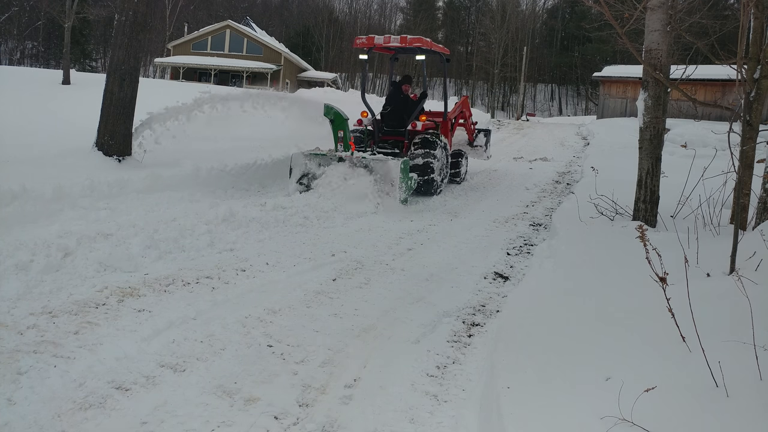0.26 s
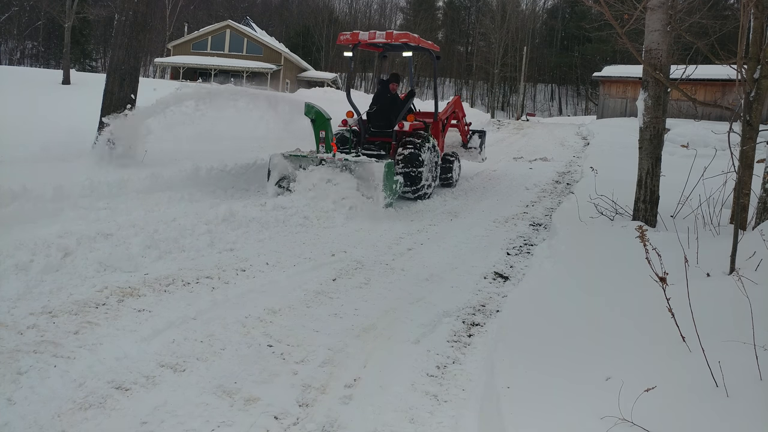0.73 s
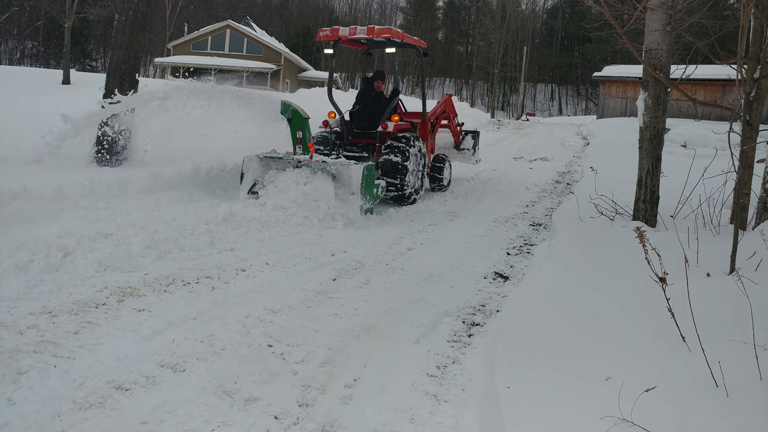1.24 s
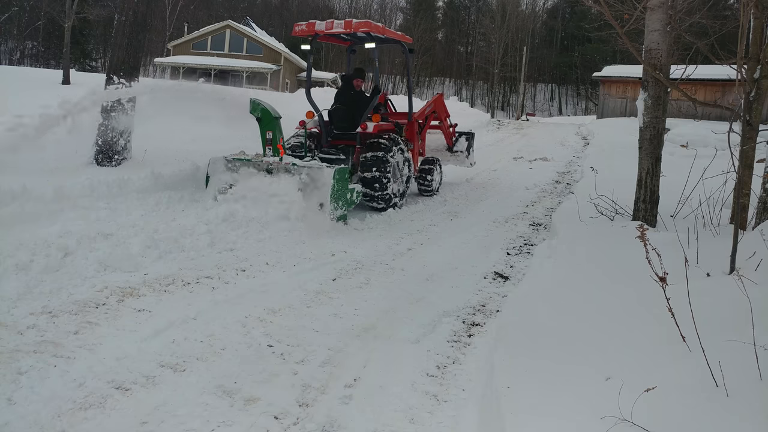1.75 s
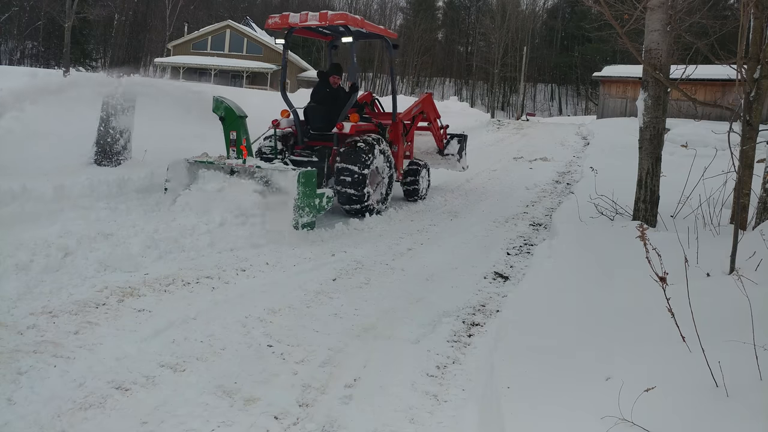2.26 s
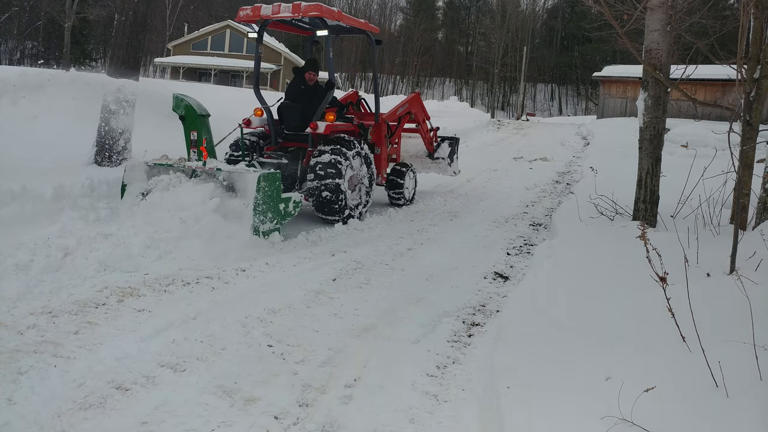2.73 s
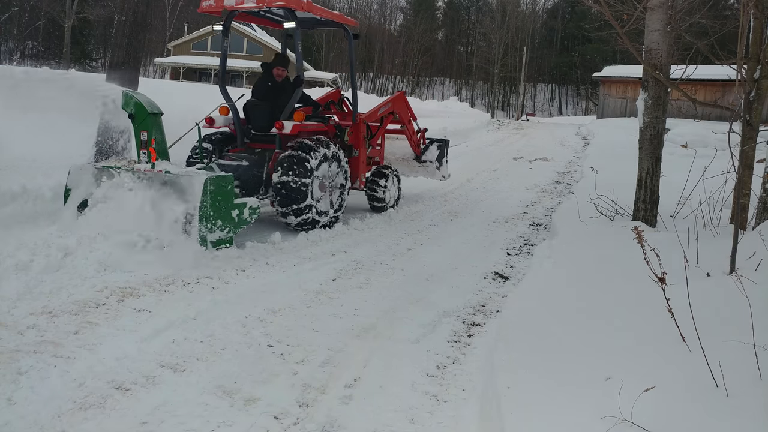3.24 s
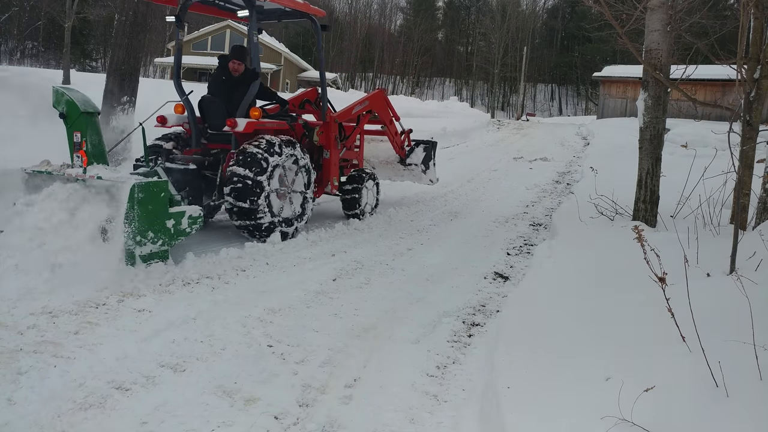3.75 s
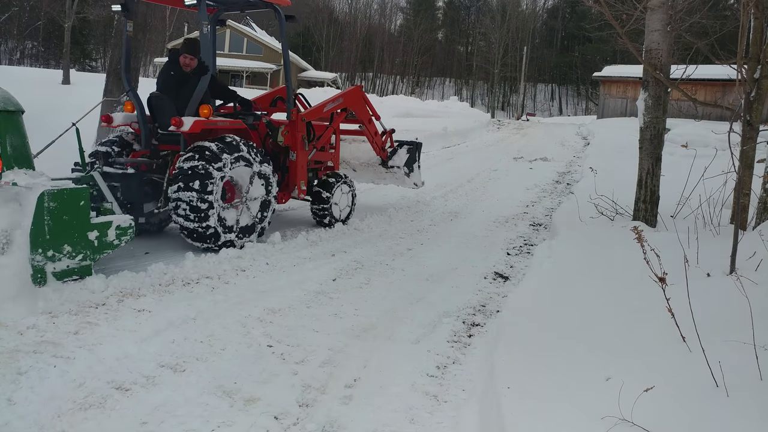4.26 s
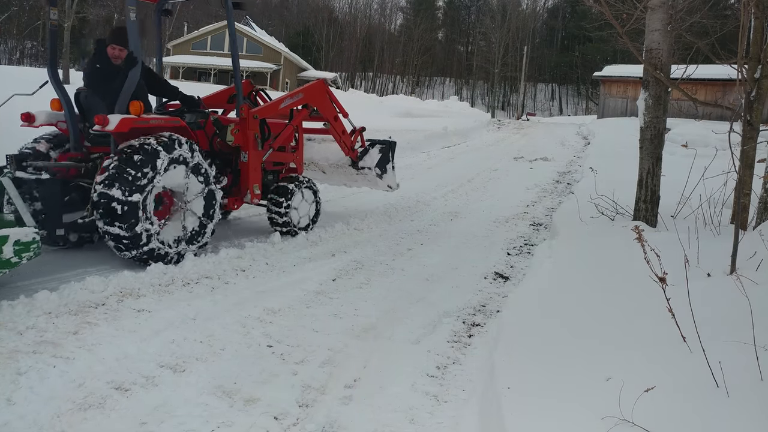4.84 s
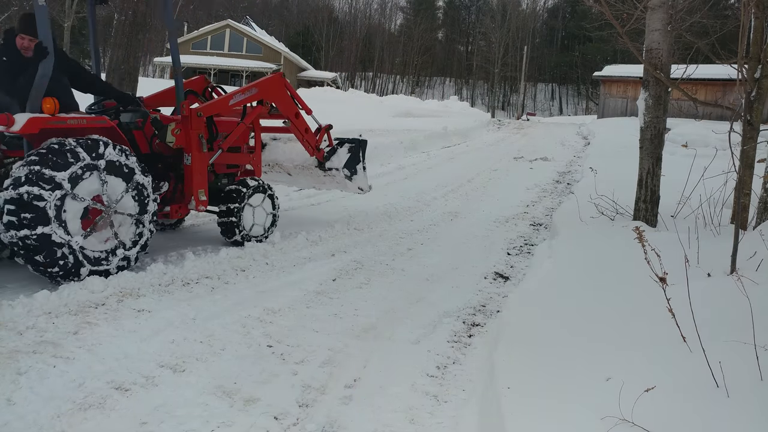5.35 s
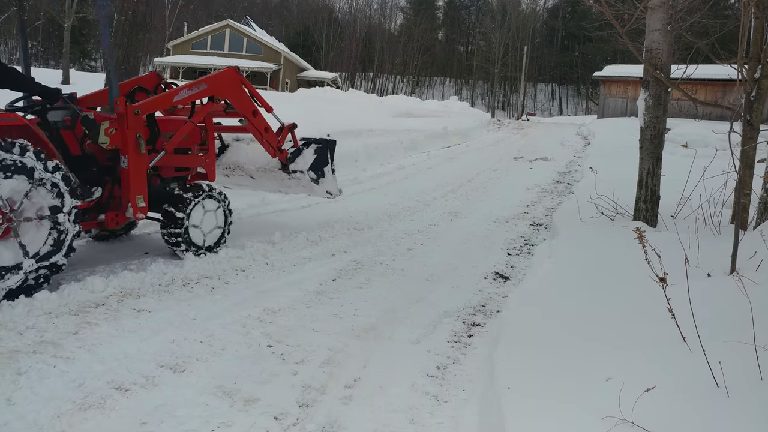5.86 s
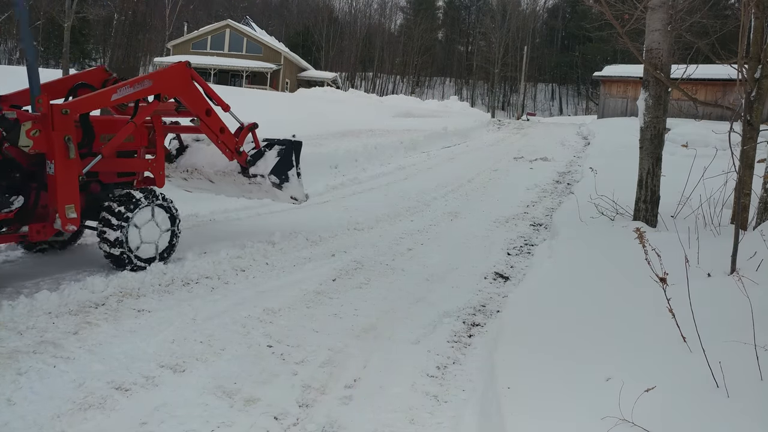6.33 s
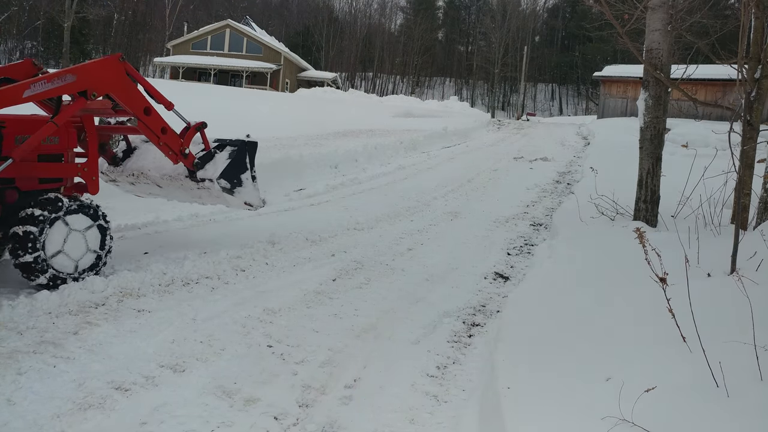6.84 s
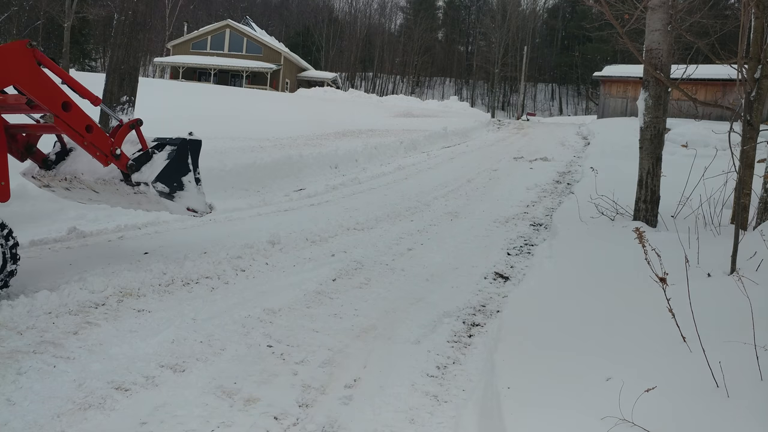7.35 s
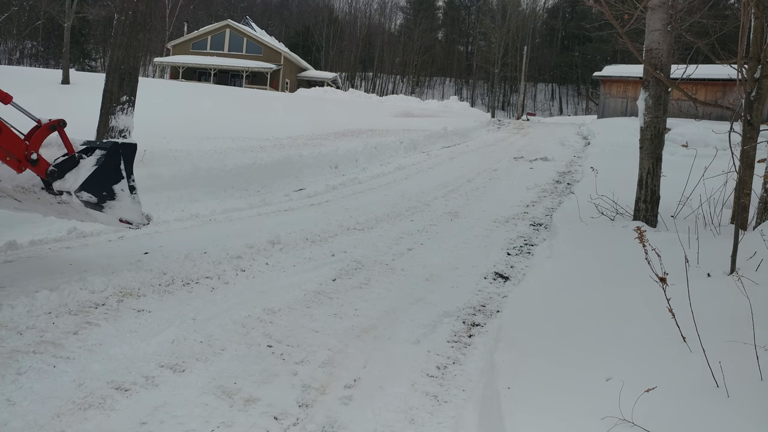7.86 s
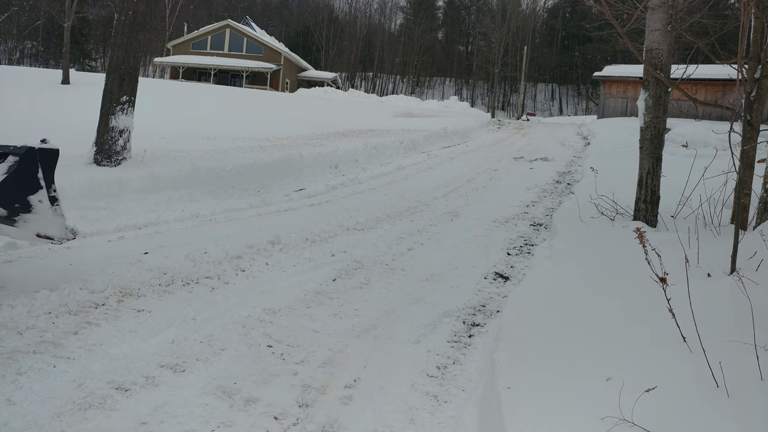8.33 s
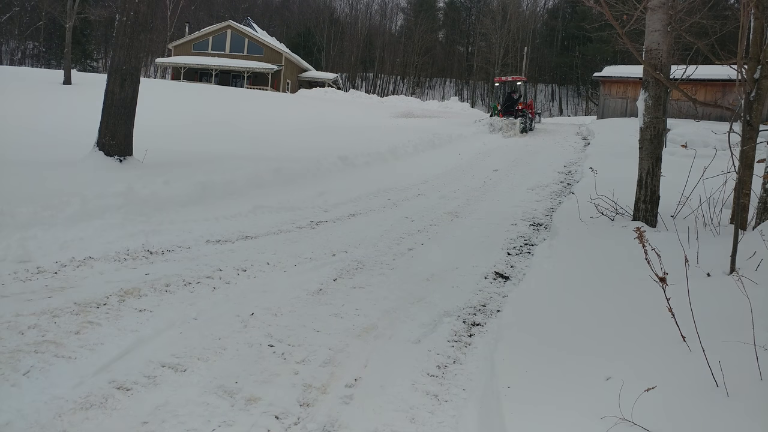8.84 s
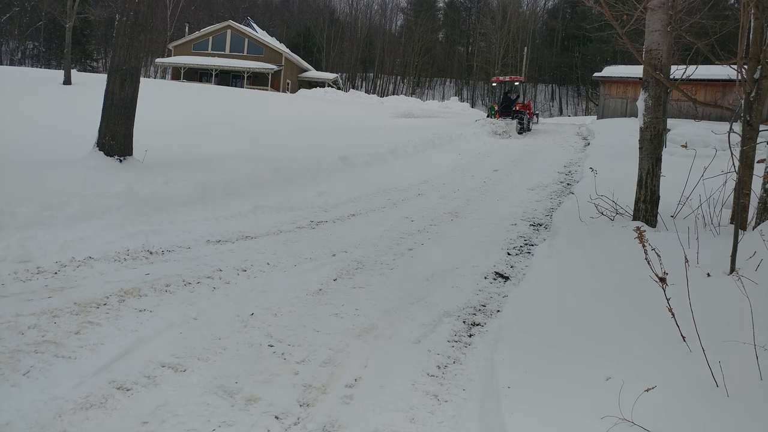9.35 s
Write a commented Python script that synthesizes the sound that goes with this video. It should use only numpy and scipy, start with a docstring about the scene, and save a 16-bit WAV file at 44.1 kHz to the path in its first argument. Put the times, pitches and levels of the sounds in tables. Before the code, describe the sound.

A small diesel tractor backs a snowblower closer, throbbing and growling as snow hisses and ice cracks, then suddenly sounds far off.

```python
"""A three-cylinder diesel tractor backs a snowblower towards a microphone pair, ever closer and further left.
Wind gusts buffet the pair first (low noise) over exhaust (phased partials), gear tones and clattering roar
(throbbing noise); fan blades beat with the exhaust. Snow hisses up the chute; ice cracks (short noise bursts),
then grit pings and the block knocks (damped tones). After a cut the tractor is heard from far off."""
import sys
import numpy as np
from scipy import signal
from scipy.fft import rfft, irfft, next_fast_len
from scipy.io import wavfile
from scipy.ndimage import uniform_filter1d, map_coordinates

SR = 44100
rng = np.random.default_rng(int(sys.argv[2]) if len(sys.argv) > 2 else 0)


def output_pcm(signal):
    """Save a mono or channel-first signal as 16-bit PCM at the path in sys.argv[1].

    Samples are clipped to [-1, 1] before scaling.
    """
    pcm = np.clip(np.atleast_2d(signal).T, -1, 1) * 32767
    wavfile.write(sys.argv[1], SR, np.round(pcm).astype(np.int16))


N = 422911
T = np.arange(N) / SR  # s
CUT_S = 8.415  # the near scene ends here

# Motion along a straight line: position and velocity as (left, ahead)
START_M, VELOCITY_M_PER_S = (0.42, 14.94), (0.29, -1.551)
BLOWER_LEAD_S = 0.41  # the blower reaches each point of the line this much earlier
PAIR_M, FAR_LEFT = 0.1994, -0.2  # microphone spacing; sine of the leftward bearing far off
# Share of noise common to both microphones: [pitch_hz, share]
COMMON_SHARE = [(50, 0.62), (100, 0.98), (500, 0.92), (1500, 0.72), (4000, 0.39), (9000, 0.16)]
# Left minus right level across the spectrum: [pitch_hz, difference_db]
SHADOW = [(1000, 0), (3000, -1.5), (5000, 1), (8500, 6), (13000, 1)]

# Engine speed; the load drags it down at first: [time_s, firing_rate_hz]
FIRING_RATE = [(0, 47.97), (.6, 48.88), (1.4, 48.83), (1.75, 51.84), (2.0, 53.43), (4, 52.95), (6.5, 53.35),
               (8.41, 53.02), (8.42, 43.1), (8.67, 44.45), (8.87, 44.28), (9.12, 42.5), (9.59, 41.94)]
LOADED_HZ, REV_DB_PER_HZ = 47.92, 0.6034  # louder as the revs recover
EXHAUST_DB, ROAR_DB = (-25, -37), (-31, -47.5)  # (reference at the start, far off)
ROAR_SPREAD = 0.92  # share of the inverse-distance gain that the long machine shows
# Exhaust partials; every third is a firing order: [multiple_of_four_stroke_cycle, near_db, far_db]
PARTIALS = [(3, 1.5, 0), (4, -43, -11), (5, -21.5, -36), (6, -1, 3.5), (8, -29.5, -29), (9, -6.5, -9.5),
            (10, -16, -34), (12, -6.5, -5), (13, -14, -39), (15, -2.5, -15), (18, -12, -16.5),
            (26, -23, -34), (30, -18, -47), (32, -18.5, -42)]
# Resonance and tone levels: [time_s, pipe_ring_db, gear_whine_db, third_firing_order_db]
RING = [(0, -4, -50.5, 2.5), (1.2, -9.5, -44, -1.5), (1.5, -5.5, -36, 1), (1.8, -4, -44, -1.5),
        (2.2, -3.5, -36, 1), (3, -4, -34, 3), (3.9, -2.5, -40.5, 4.5), (4.3, -1.5, -31.5, 3),
        (5.5, -2.5, -34, 0.5), (6.8, -1, -34, -13.5), (7.5, 0, -26.5, -1.5), (8.4, -4, -30, 1),
        (8.42, 2.5, -53, -1), (8.67, 3, -49.5, 4), (9.12, 1.5, -59, -5.5), (9.59, 3, -62.5, -0.5)]
# Upper exhaust partials come and go:
# [time_s, multiple_18_db, multiple_26_db, multiple_30_db, multiple_32_db]
UPPER = [(4.5, 2.5, 2, -3.5, 0), (5.35, -10, 1, 2, 0), (6.8, 3, -4, -0.5, 4), (7.4, -1, -3, 5, -1),
         (8.2, -9, 7.5, 4, -2)]
UPPER_ORDERS = (18, 26, 30, 32)
# Gear partials: [multiple_of_firing_rate, level_db]
WHINE = [(16, -0.5), (32, -6.5), (34, -7.5)]
# Pump tone before its final fade: [time_s, second_partial_hz, level_db]
PUMP = [(0, 1108, -54), (.5, 1092, -44.5), (1.2, 1120, -44.5), (1.7, 1126, -53)]

# Relative roar spectra at the start, close by and far off: [pitch_hz, density_db_per_hz]
ROAR_START = [(18, -32.5), (30, -8), (78, 0), (226, -8.5), (393, -20), (479, -27), (547, -21), (683, -26),
              (763, -25.5), (1390, -29), (1620, -26.5), (1980, -31.5), (2470, -32.5), (3680, -44.5),
              (6000, -47.5)]
ROAR_NEAR = [(18, -26), (30, -16), (70, -14.5), (109, -8), (162, -10.5), (263, -12), (315, -28.5),
             (367, -19), (560, -20.5), (683, -20.5), (853, -23), (1110, -25.5), (1850, -23.5),
             (2260, -30.5), (3600, -32), (6000, -46)]
ROAR_FAR = [(18, -54.5), (30, -18), (67, -4), (91, -3), (130, -17), (181, -17), (216, -30), (263, -19),
            (401, -31), (524, -24.5), (834, -31), (1390, -26.5), (1850, -30.5), (2360, -43), (6000, -54)]
# Share of the roar that repeats each cycle: [pitch_hz, share]
REPEATS = [(330, 0.0058), (480, 0.21), (560, 0.21), (900, 0.2), (2000, 0.26), (4000, 0.091)]

BLADES_PER_FIRING, AUGER_PER_FIRING = .5508, .0433  # gearing of the blower fan and auger
# Blade partials, each with a partner one auger turn lower: [multiple_of_blade_rate, level_db, partner_db]
BLADES = [(2, -3, -6.5), (3, -6.5, -6)]
# Level of the blade hum: [time_s, level_db]
FAN = [(0, -28), (2, -25.5), (4, -22), (6, -23.5), (7.4, -28.5), (8.41, -32), (8.42, -60.5)]

# Relative spectrum of the rushing snow: [pitch_hz, density_db_per_hz]
SPRAY = [(880, -28.5), (1500, -11.5), (1760, 1), (2700, -9), (3990, -9.5), (4770, -4.5), (5710, -7),
         (7040, -15), (8340, -6.5), (9220, -9.5), (10700, -43), (11800, -22.5), (13500, -22),
         (15200, -28.5), (16300, -42.5)]
# Mean level of the thrown snow: [time_s, level_db]
SNOW = [(0, -42.5), (.52, -47.5), (1.95, -39.5), (2.27, -32.5), (2.9, -35.5), (3.63, -31), (4.38, -32),
        (5.83, -30.5), (6.86, -27), (8.41, -24.5), (8.417, -57), (8.83, -68.5), (9.59, -64)]
# Bright bands sinking through the rush as the machine nears, perhaps from ground reflection:
# [start_s, end_s, from_hz, to_hz, top_db]
SWEEPS = [(2.8, 5.6, 5600, 2510, 7.5), (6.3, 8.0, 4200, 2000, 2.5)]
SWEEP_OCTAVES = .3

# Relative spectrum of wind turbulence: [pitch_hz, density_db_per_hz]
BUFFET = [(24, -33), (40, -3), (70, -7.5), (124, -2), (236, -20.5), (274, -14.5), (459, -33), (500, -17.5),
          (650, -70)]
BREEZE_DB, BREEZE_FAR_DB = -29.5, -39
# Gusts: [centre_s, half_length_s, level_db, left_minus_right_db]
GUSTS = [(0.337, 0.013, -7.5, 13), (0.443, 0.069, -11, 9.5), (0.536, 0.053, -12, 10),
         (0.948, 0.12, -20, 14), (1.148, 0.01, -15, 15), (1.447, 0.026, -9, -19), (1.58, 0.081, -13.5, -6)]

# Ice blows: [start_s, chute_db, housing_db, brightest_hz, near_length_s]
CRACKS = [(0.2252, -33, -14, 2720, 0.006), (0.66, -38.5, -34, 4500, 0.0051),
          (1.0326, -23, -21.5, 5300, 0.0095), (1.074, -21, -18, 5030, 0.0061),
          (1.0784, -23.5, -26, 8550, 0.0065), (1.11, -27.5, -33, 3400, 0.0052),
          (1.299, -30, -26, 5000, 0.0092), (2.059, -31, -42, 8400, 0.014), (2.105, -27, -17, 2600, .006),
          (2.129, -25, -23, 5030, 0.0054), (2.149, -27.5, -11.5, 2930, 0.015),
          (2.181, -26.5, -21, 2550, 0.0092), (2.219, -15, -18, 8610, 0.0057),
          (2.2405, -15, -17, 5500, 0.0061), (2.2775, -9, -40, 8000, 0.001),
          (2.2954, -15, -22, 8000, 0.0058), (2.3287, -13, -17.5, 5600, 0.0085),
          (2.355, -30, -19, 2840, 0.0072), (2.623, -23, -45, 8850, 0.0039),
          (2.999, -23.5, -26, 4600, 0.0063), (3.133, -21, -37, 4500, 0.0025),
          (3.252, -19.5, -43, 5360, 0.0043), (3.437, -27, -24, 5150, 0.0095),
          (3.61, -28, -25, 4980, 0.0099), (3.649, -23.5, -22.5, 5615, 0.0054),
          (3.823, -27, -35, 4500, 0.0056), (3.905, -22, -31, 8200, 0.0063), (3.986, -28, -33, 4400, 0.0063),
          (4.067, -31, -35, 2608, .006), (4.399, -29, -36, 8620, 0.0046), (4.462, -32, -36, 2800, 0.0045),
          (4.629, -14.5, -30, 5960, 0.0052), (4.6573, -14, -32, 5860, 0.0055),
          (4.7895, -20.5, -32, 6000, 0.0041), (5.0178, -14.5, -11, 5600, 0.0042),
          (5.032, -15, -17, 3817, 0.0039), (5.19, -20.5, -16, 5700, 0.0075),
          (5.214, -21.5, -16, 3100, 0.0054), (5.26, -18.5, -25.5, 8350, 0.0075),
          (5.346, -27.5, -32, 8600, 0.015), (5.379, -15.5, -39, 8400, 0.0052),
          (5.393, -15, -34, 5700, 0.0076), (5.405, -21, -24, 4020, 0.0056),
          (5.901, -21.5, -24, 4760, 0.0029), (6.838, -22.5, -14, 3650, 0.005),
          (6.924, -12, -26, 4000, 0.0044), (6.9925, -11.5, -28, 4000, 0.0048),
          (7.0327, -8.5, -15, 4260, 0.0063), (7.501, -7.5, -14, 5877, 0.0059),
          (7.59, -14.5, -22.5, 3815, 0.004), (7.5992, -16.5, -15, 5790, 0.0055),
          (7.714, -12, -28, 5700, 0.0078), (7.7255, -8, -11, 5700, 0.0047), (7.858, -10, -32, 5740, 0.0041),
          (8.177, -20, -19, 5850, 0.0078), (8.386, -24, -19, 3720, 0.0074),
          (8.793, -62, -43.5, 2660, 0.0061), (9.077, -64, -42.5, 2615, .0058),
          (9.384, -64, -44, 2833, 0.0049), (9.545, -51.5, -33.5, 2710, 0.0074)]
# Relative spectrum of a burst in the chute: [pitch_hz, density_db_per_hz]
CRACK = [(290, -42.5), (500, -25.5), (936, 1.5), (1580, -7), (2120, 0), (2480, -4.5), (4020, -5.5),
         (5700, -7.5), (6890, -9), (8330, -4), (9220, -7.5), (10500, -27.5), (12000, -18), (15100, -19.5),
         (16300, -44.5)]
# Modes of the blower housing: [pitch_hz, level_db, width_hz]
HOUSING = [(470, -1, 60.3), (930, 1.5, 190), (1150, -4, 100), (1400, -4.5, 130), (1787, -4, 140),
           (2090, -3.5, 230)]
# Modes of the chute: [turned_away_hz, facing_hz, level_over_burst_db, width_hz]
CHUTE = [(2590, 2590, -0.5, 150), (3150, 3980, 8.5, 480), (5600, 5860, 4, 250), (8400, 8400, 5, 500)]
# The chute's modes shift and stand out as it comes to face the microphones
CHUTE_FACES_S, CHUTE_TURN_S, CHUTE_EARLY = 5.5, 0.55, 0.41  # midpoint, logistic scale, share at first
RISE_SHARE, TAIL_PER_S = .15, 62.5  # rise as a share of length; tail height per second of length
# Clear notes left in the steel by the hardest blows: [start_s, pitch_hz, peak_db, decay_s]
NOTES = [(0.226, 980, -13, .006), (0.225, 1390, -18, .004), (1.075, 1050, -13.5, 0.005),
         (1.075, 1970, -12, .004), (2.151, 1210, -11, 0.0093), (2.156, 910, -11, .008),
         (2.214, 888, -15.5, .006), (2.241, 1930, -13.5, 0.0052), (5.019, 1020, -11, .006),
         (5.034, 861, -12.5, 0.018), (5.193, 776, -14, 0.01506), (5.2, 373, -15.5, 0.017),
         (5.203, 465, -16.5, 0.031), (6.927, 4100, -5, .003), (6.993, 4020, -10.5, 0.0033),
         (7.035, 4120, -11.5, .005), (7.717, 5940, -10, .004), (7.719, 4100, -9, 0.0059),
         (7.727, 2130, -3.5, 0.0054), (8.388, 1950, -9.5, .006), (7.859, 5736, -11, 0.0043)]

# Fine grit pinging in the chute, its pitch sinking from high to low over about three seconds
GRIT_CENTRE_S, GRIT_HALF_SPAN_S, GRIT_PEAK_PER_S = 3.5, 1.45, 170
GRIT_DB, GRIT_HZ, GRIT_DECAY_S = -36.5, (6530, 2420), 0.0017
# Gear tones that swell and fade briefly: [multiple_of_four_stroke_cycle, centre_s, half_length_s, level_db]
SPELLS = [(96, 4.15, .35, -41.5), (102, 4.0, .45, -40.5), (105, 5.36, .2, -37.5), (204, 6.9, 0.43, -43.5)]
# Knocks of the block: [start_s, peak_db]
KNOCKS = [(3.877, -24), (3.898, -26), (4.045, -23), (4.102, -25), (4.196, -19), (4.386, -23), (4.858, -22),
          (4.951, -16), (5.007, -19), (5.12, -16.5), (5.178, -22)]
KNOCK_HZ, KNOCK_RING_S = (1716, 1630), 0.0037  # pitch at the first and last knock

LOW_CUT_HZ, EDGE_HZ = 43.2, 16430  # limits of the recorded band


def amp(db):
    """Logarithmic level: decibels become an amplitude ratio."""
    return 10 ** (np.asarray(db) / 20)


def unit(x):
    """Power normalisation: the signal is scaled to rms 1."""
    return x / np.sqrt(np.mean(x ** 2) + 1e-20)


def read(points, hz):
    """Spectral interpolation: values run straight between points on a log-frequency axis."""
    f, value = np.transpose(points)
    return np.interp(np.log(hz + 1), np.log(f + 1), value)


def curve(rows, t, axis):
    """Linear interpolation: one column of a table over time."""
    rows = np.array(rows, float)
    return np.interp(t, rows[:, 0], rows[:, axis])


def drift(rate_hz):
    """Slow fluctuation: sixteen sines of random phase, up to rate_hz, sum to rms 1."""
    phases = rng.random(16)
    rates = np.geomspace(rate_hz / 10, rate_hz, len(phases))
    t = T[::64]
    slow = sum(np.sin(2 * np.pi * (f * t + p)) for f, p in zip(rates, phases))
    return np.interp(T, t, unit(slow))


def noise(shape_db, size, patchy_db, like=None, repeating=None):
    """Partial coherence: random short-time spectra share a part between channels and may hold a cyclic part."""
    hop, hz = size // 4, np.fft.rfftfreq(size, 1 / SR)
    frames = N // hop + 2
    a, b, c, d, patch = rng.standard_normal((frames, len(hz), 5)).T
    patch = unit(uniform_filter1d(uniform_filter1d(patch, 8, 0), 6, 1))
    common = read(COMMON_SHARE, hz) if like is None else like + 0 * hz
    common = np.clip(common, 0, 1)[:, None]
    left = a + 1j * b
    if repeating is not None:
        share = np.clip(read(REPEATS, hz), 0, 1)[:, None]
        cyclic = signal.stft(repeating, nperseg=size, noverlap=size - hop)[2][:, :frames]
        cyclic = cyclic / np.sqrt(np.mean(abs(cyclic) ** 2, 1, keepdims=True) / 2)
        left = np.sqrt(1 - share) * left + np.sqrt(share) * cyclic
    right = common * left + np.sqrt(1 - common ** 2) * (c + 1j * d)
    gain = amp(shape_db(hz, np.arange(frames) * hop / SR) + patchy_db * patch)
    pair = signal.istft(np.array([left, right]) * gain, nperseg=size, noverlap=size - hop)[1]
    return pair[:, :N] / np.sqrt(size)


def levelled(db, hz, lo_hz, hi_hz):
    """Band power: spectra are shifted so that the power between two frequencies is 0 dB."""
    band = (hz >= lo_hz) & (hz < hi_hz)
    return db - 10 * np.log10((amp(db[band]) ** 2).sum(0)) + 10 * np.log10(len(hz))


def place(lead_s):
    """Kinematics: uniform motion gives the distance in metres and the sine of the leftward bearing."""
    left, ahead = (start + speed * (T + lead_s) for start, speed in zip(START_M, VELOCITY_M_PER_S))
    metres = np.hypot(left, ahead)
    return metres, np.where(T > CUT_S, FAR_LEFT, left / metres)


def loudness(levels_db, spread):
    """Inverse-distance law: level grows with nearness and revs before the cut, and is steady after it."""
    metres = place(0)[0]
    approach_db = spread * 20 * np.log10(metres[0] / metres)
    revs_db = REV_DB_PER_HZ * (curve(FIRING_RATE, T, axis=1) - LOADED_HZ)
    return np.where(T > CUT_S, levels_db[1], levels_db[0] + approach_db + revs_db)


def arrive(pair, lead_s):
    """Path difference: the right channel lags by spacing times bearing sine over the speed of sound."""
    lag = place(lead_s)[1] * PAIR_M / 343 * SR  # samples
    return np.array([pair[0], map_coordinates(pair[1], [np.arange(N) - lag], order=3, mode="nearest")])


def exhaust(turns):
    """Fourier synthesis: aligned partials form suction-shaped pulses; the upper ones ring in the pipe."""
    far, ring_db, out = T > CUT_S, curve(RING, T, axis=1), np.zeros(N)
    uneven = turns + .003 * drift(8)  # the crank turns unevenly
    for k, near_db, far_db in PARTIALS:
        db = np.where(far, far_db, near_db) + 1.1 * drift(5)
        if k > 10:
            db = db + ring_db
        if k == 9:
            db = db + curve(RING, T, axis=3)
        if k in UPPER_ORDERS:
            db = db + ~far * curve(UPPER, T, axis=1 + UPPER_ORDERS.index(k))
        # the pipe ring is out of step with the pulse
        late = 1.3 * (k > 7) + 6 * rng.random() * (k > 15)
        out -= amp(db) * np.cos(2 * np.pi * k * uneven / 3 + late + .08 * drift(5))
    return amp(loudness(EXHAUST_DB, 1)) * out


def whine(turns):
    """Tooth-mesh tones: gears sing at multiples of shaft speed; air and snow absorb the upper ones far off."""
    far, out = T > CUT_S, 0
    for k, db in WHINE:
        level = amp(db + 2.2 * drift(12) - 15 * far * (k > 16))
        out = out + level * np.sin(2 * np.pi * k * turns + 0.59 * drift(7))
    return np.sqrt(2) * amp(curve(RING, T, axis=2)) * out


def pump():
    """Harmonic series: a faint three-partial whine, likely hydraulic, fades as the engine picks up."""
    # half the tabled pitch is the fundamental
    phase = np.pi * np.cumsum(curve(PUMP, T, axis=1)) / SR + 1.6 * drift(14)
    tone = amp(3.0) * np.sin(phase) + np.sin(2 * phase) + amp(3.5) * np.sin(3 * phase)
    fade_db = 27 * np.clip(T - 1.7, 0, 3)
    return np.sqrt(2) * amp(curve(PUMP, T, axis=2) - fade_db + 1.6 * drift(12)) * tone


def clatter(turns):
    """Cyclic repetition: valves and injectors knock nearly alike each four-stroke cycle, slowly changing."""
    size = 1024
    along = np.arange(size) / size
    strokes = 1 + 0.42 * np.exp(-(3 * along % 1) / 0.083) + 0.35 * np.exp(-along / 0.026)
    pattern = rng.standard_normal((16, size)) * strokes
    # a blend into the next pattern takes 0.8 s
    return map_coordinates(pattern, [T / .8, (turns / 3 % 1) * size], order=1, mode="grid-wrap")


def roar(turns):
    """Amplitude modulation: noise of block, fan and auger throbs with firing; distance changes its colour."""
    def shape(hz, t):
        close = np.clip((t - 1.2) / 5.14, 0, 1)
        near = np.outer(read(ROAR_START, hz), 1 - close) + np.outer(read(ROAR_NEAR, hz), close)
        db = np.where(t > CUT_S, read(ROAR_FAR, hz)[:, None], near)
        return levelled(db - 40 * (hz > 6000)[:, None], hz, 350, 2500)
    throb = 1 + 0.18 * np.cos(2 * np.pi * (turns - .3)) + 0.1 * np.cos(2 * np.pi * turns / 3)
    rumble = noise(shape, size=1024, patchy_db=1.5, repeating=clatter(turns))
    return amp(loudness(ROAR_DB, ROAR_SPREAD)) * throb * rumble


def fan(turns):
    """Beating: a blade hum just above the firing rate beats with it; uneven auger feed adds partner tones."""
    blade, auger = 2 * np.pi * BLADES_PER_FIRING * turns, 2 * np.pi * AUGER_PER_FIRING * turns
    out = 0
    for (k, db, partner_db), (a, b) in zip(BLADES, 2 * np.pi * rng.random((len(BLADES), 2))):
        out = out + amp(db) * np.sin(k * blade + a)
        out = out + amp(partner_db) * np.sin(k * blade - auger + b)
    return np.sqrt(2) * amp(curve(FAN, T, axis=1) + drift(3)) * out


def spray():
    """Shot noise on flow noise: snow hisses up the chute with dense small crackles in three bands."""
    def shape(hz, t):
        db = levelled(read(SPRAY, hz)[:, None] - 30 * (hz < 1500)[:, None] + 0 * t, hz, 2500, 10000)
        for start, end, from_hz, to_hz, top_db in SWEEPS:
            along = np.clip((t - start) / (end - start), 0, 1)
            centre_hz = from_hz * (to_hz / from_hz) ** along
            off = np.log2((hz[:, None] + 1) / centre_hz) / SWEEP_OCTAVES
            db = db + top_db * np.sqrt(np.abs(np.sin(np.pi * along))) * np.exp(-off ** 2)
        return db
    hiss, out = noise(shape, size=256, patchy_db=0.5), 0
    for band_hz in [(200, 3500), (3500, 6800), (6800, 20000)]:
        # about 60 ticks a second, each dying over 4.5 ms
        ticks = amp(6.2 * np.minimum(rng.exponential(1, N), 3.5)) * (rng.random(N) < 60 / SR)
        grains = signal.lfilter([1], [1, -np.exp(-1 / (0.0045 * SR))], ticks)
        band = signal.sosfilt(signal.butter(3, band_hz, "band", fs=SR, output="sos"), hiss)
        out = out + (1 + 0.3 * grains) * band
    return amp(curve(SNOW, T, axis=1) + 1.5 * drift(14)) * out


def wind():
    """Turbulence: lumpy low noise, weakly related between microphones, is a breeze with gusts on top."""
    def shape(hz, t):
        return levelled(read(BUFFET, hz)[:, None] - 40 * (hz > 500)[:, None] + 0 * t, hz, 40, 250)
    level = amp(np.where(T > CUT_S, BREEZE_FAR_DB, BREEZE_DB)) * np.ones((2, 1))
    for s, half_s, db, pan_db in GUSTS:
        sides_db = db + np.array([[pan_db], [-pan_db]]) / 2
        level = level + amp(sides_db) * np.exp(-((T - s) / half_s) ** 2)
    return level * amp(0.78 * drift(9.9)) * noise(shape, size=1024, patchy_db=3.0, like=0.34)


def notes():
    """Modal decay: each struck steel mode starts quickly and dies exponentially."""
    t, out = np.arange(4096) / SR, np.zeros(N + 4096)
    for s, hz, db, decay_s in NOTES:
        at = round(s * SR)
        envelope = (1 - np.exp(-t / .0007)) * np.exp(-t / decay_s)
        out[at:at + len(t)] += amp(db) * envelope * np.sin(2 * np.pi * hz * t)
    return out[:N]


def cracks():
    """Impact excitation: each lump of ice is a chute burst with a rattling tail, and a ring of the housing."""
    size = 4096
    t, hz, out = np.arange(size) / SR, np.fft.rfftfreq(size, 1 / SR), np.zeros((2, N + size))
    draws = rng.standard_normal((len(CRACKS), 3, size))
    modes = sum(amp(db) / (1 + ((hz - f) / width) ** 2) for f, db, width in HOUSING)
    housing = levelled(20 * np.log10(modes), hz, 600, 2500)
    burst = read(CRACK, hz)
    for (s, chute_db, housing_db, ring_hz, length), (a, b, c) in zip(CRACKS, draws):
        source = rfft([a, .6 * a + .8 * b])  # channels partly alike
        turned = 1 / (1 + np.exp((CHUTE_FACES_S - s) / CHUTE_TURN_S))
        facing = CHUTE_EARLY + (1 - CHUTE_EARLY) * turned
        ringing = 0
        for away_hz, front_hz, db, width in CHUTE:
            mode_hz = away_hz + (front_hz - away_hz) * turned
            ringing = ringing + db / (1 + ((hz - mode_hz) / width) ** 2)
        bright = 9.2 * np.exp(-(np.log2((hz + 1) / ring_hz) / 0.19) ** 2)
        chute = levelled(burst + facing * ringing + bright, hz, 3300, 9900) - 25 * (hz < 2300)
        rattle = amp(3.7 * unit(uniform_filter1d(c, 90)))
        slow = 3.5 if s > CUT_S else 1  # far off, echoes spread each blow
        rise = np.minimum(t / (RISE_SHARE * length), 1)
        snap = np.exp(-(t / max(length * slow, .001)) ** 1.4)
        snap = snap + TAIL_PER_S * length * rattle * np.exp(-t / 0.027)
        in_chute = amp(chute_db) * irfft(source * amp(chute)) * snap
        in_housing = amp(housing_db) * irfft(rfft(a) * amp(housing)) * np.exp(-t / (0.0083 * slow))
        at = round(s * SR)
        same_scene = (s > CUT_S) | (s + t < CUT_S)  # near blows stop at the cut
        out[:, at:at + size] += rise * (in_chute + in_housing) * same_scene
    return out[:, :N]


def grit():
    """Poisson impacts: short pings of scattered pitch and size come densely for a while."""
    count = 10  # pitch classes
    t, out = np.arange(512) / SR, np.zeros(N)
    along = (T - GRIT_CENTRE_S) / GRIT_HALF_SPAN_S
    hits = rng.random(N) < GRIT_PEAK_PER_S * np.exp(-along ** 4) / SR
    size = amp(5.1 * np.minimum(rng.exponential(1, N), 3)) * hits
    kind = np.round(count * (along + 1) / 2 + rng.standard_normal(N))
    kind = np.clip(kind, 0, count - 1)
    for k, hz in enumerate(np.geomspace(*GRIT_HZ, count)):
        envelope = t / (2 * GRIT_DECAY_S) * np.exp(1 - t / GRIT_DECAY_S)
        out += signal.oaconvolve(size * (kind == k), envelope * np.sin(2 * np.pi * hz * t))[:N]
    return amp(GRIT_DB) * out


def spells(turns):
    """Amplitude modulation: gear tones swell and fade, throbbing with each firing."""
    throb, out = 1 + .6 * np.cos(2 * np.pi * turns), 0
    for k, s, half_s, db in SPELLS:
        level = amp(db + 2.5 * drift(25)) * np.exp(-((T - s) / half_s) ** 4)
        out = out + level * np.sin(2 * np.pi * k * turns / 3 + .6 * drift(9))
    return np.sqrt(2) * throb * out


def knock():
    """Damped vibration: the block knocks like a struck plate, each knock swelling and dying in milliseconds."""
    since, out = np.arange(2048) / SR, np.zeros(N)
    for s, db in KNOCKS:
        hz = np.interp(s, [KNOCKS[0][0], KNOCKS[-1][0]], KNOCK_HZ)
        at = round(s * SR)
        envelope = since / KNOCK_RING_S * np.exp(1 - since / KNOCK_RING_S)
        out[at:at + len(since)] += amp(db) * envelope * np.sin(2 * np.pi * hz * since)
    return out


def scene():
    """Superposition: tractor and blower arrive across the microphone pair; wind acts at the microphones."""
    turns = np.cumsum(curve(FIRING_RATE, T, axis=1)) / SR  # counted in firings
    engine = exhaust(turns) + whine(turns) + pump() + roar(turns) + knock() + spells(turns)
    tractor = arrive(engine + fan(turns), 0)
    blower = arrive(spray() + cracks() + grit() + notes(), BLOWER_LEAD_S)
    size = next_fast_len(N)
    shadow_db = read(SHADOW, np.fft.rfftfreq(size, 1 / SR)) / 2
    shadowed = irfft(rfft(tractor + blower, size) * amp([shadow_db, -shadow_db]), size)[:, :N]
    # a quick fade out and in at the cut
    return (shadowed + wind()) * (1 - np.exp(-((T - CUT_S) / .006) ** 2))


def record(dry):
    """Dynamic range limiting: low cut, a limiter that ducks after loud peaks, clipping, then a band limit."""
    dry = signal.sosfiltfilt(signal.butter(5, LOW_CUT_HZ, "high", fs=SR, output="sos"), dry)
    peak_db = 20 * np.log10(np.abs(dry).max(0) + 1e-9)
    fall_db = T * 48.5  # the held peak recovers at 48.5 dB a second
    held_db = np.maximum.accumulate(peak_db + fall_db) - fall_db
    over_db = np.maximum(held_db + 1.5, 0)
    ducked = dry / amp(0.62 * uniform_filter1d(over_db, 60))
    band_limit = signal.firwin(511, EDGE_HZ, window=("kaiser", 9), fs=SR)
    return signal.oaconvolve(np.clip(ducked, -1, 1), band_limit[None], "same")


dry = scene()
out = record(dry)
output_pcm(out)
```